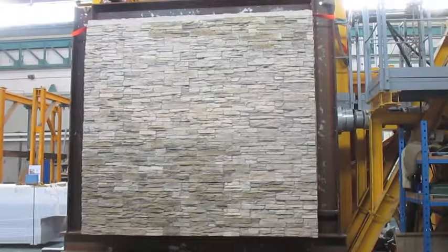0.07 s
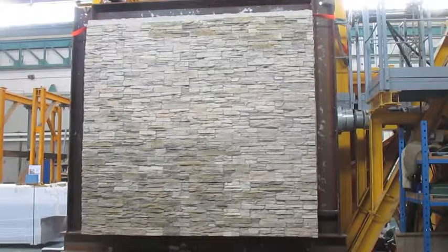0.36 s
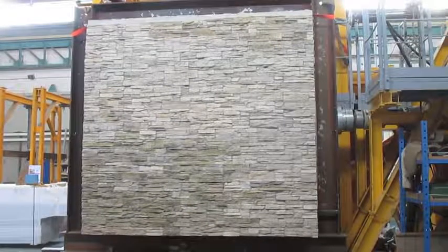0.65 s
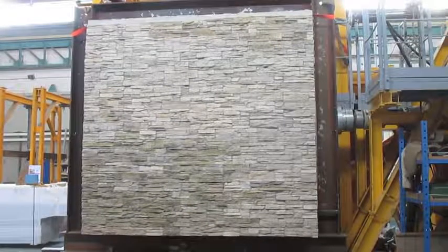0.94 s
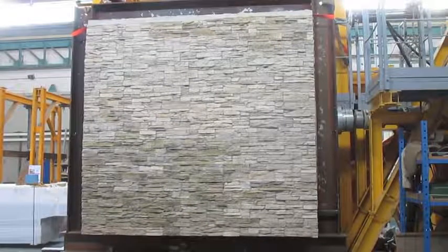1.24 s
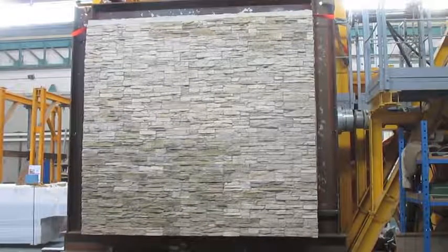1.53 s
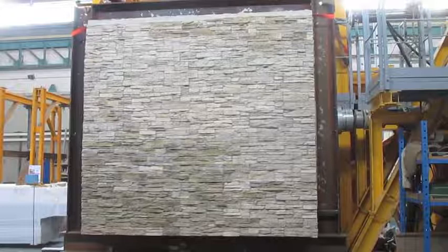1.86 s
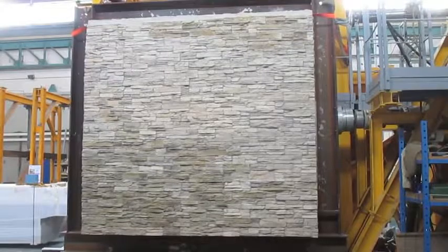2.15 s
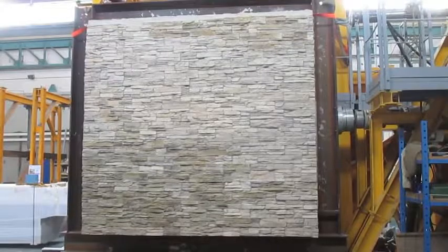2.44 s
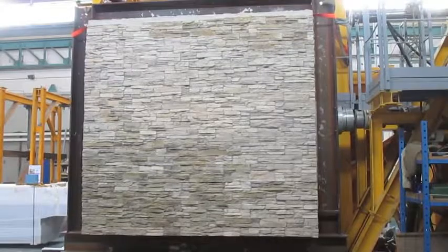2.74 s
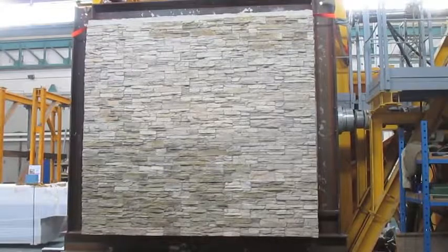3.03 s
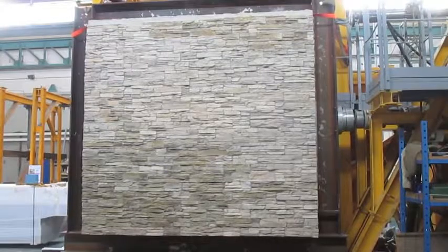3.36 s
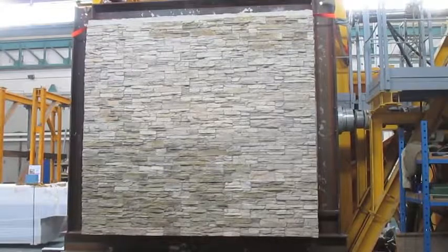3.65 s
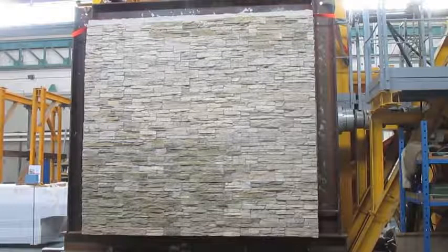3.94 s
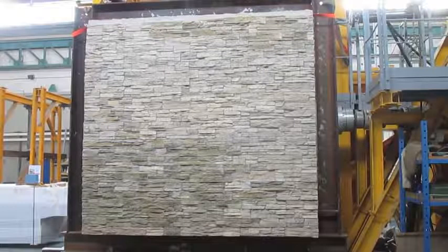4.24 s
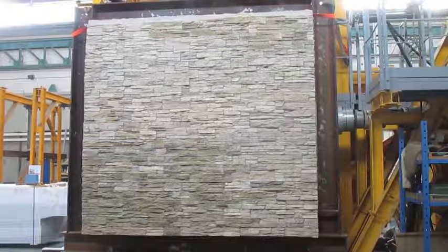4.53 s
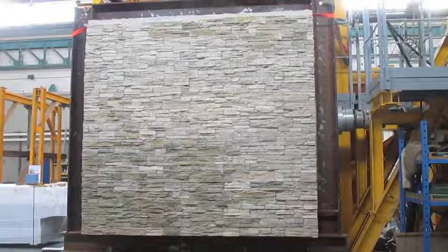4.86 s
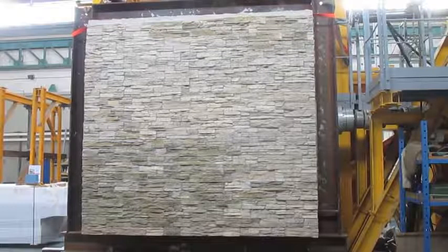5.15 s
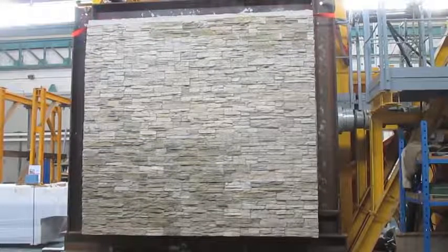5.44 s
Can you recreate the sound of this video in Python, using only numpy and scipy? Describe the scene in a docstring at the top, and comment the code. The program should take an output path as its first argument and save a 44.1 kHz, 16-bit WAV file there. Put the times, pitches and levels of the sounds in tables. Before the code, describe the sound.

An echo dies away in a large hall, leaving a faint hydraulic hum and whine. After a brief valve hiss, a shake table slams into motion, and a stone wall rattles loudly over the fast drumming of its steel frame for about a second. The noise rings out, the hum returns, and a second similar burst follows. Each burst includes a couple of dull knocks from loose blocks.

```python
"""Two bursts of drumming and stone clatter, about fifteen strokes a second, ring on in a large hall.
A hydraulic shake table rocks a stacked-stone wall in a steel frame: each stroke drums the frame
and sets the stones chattering. Between the bursts the hydraulics hum and hiss.
At the start, the echo of an earlier burst dies away."""
import sys
import numpy as np
from scipy import signal
from scipy.fft import rfft, irfft
from scipy.io import wavfile

SR = 44100
rng = np.random.default_rng(int(sys.argv[2]) if len(sys.argv) > 2 else 0)


def put_to_file(sound):
    """Save the sound as 16-bit audio at rate SR, in the file named by the first command-line argument."""
    columns = np.atleast_2d(sound).T  # one column per channel
    safe = np.clip(columns, -1, 1)
    whole_steps = np.round(safe * 32767)
    wavfile.write(sys.argv[1], SR, whole_steps.astype(np.int16))


N = 246519
T = np.arange(N) / SR
HZ = np.fft.rfftfreq(N, 1 / SR)
STROKE_HZ = 15.1

# Runs of the shake table. Each row: start in seconds, wind-up in seconds, opening force in dB.
BURSTS = [(1.682, 0.054, -1), (4.539, 0.097, -2.5)]
# Loose blocks dropping back. Each row: time in seconds, knock level in dB, thump level in dB.
BLOCK_DROPS = [(2.446, -2, -20), (2.57, -13, -12), (4.906, -10.5, -11.5), (5.035, -17, -6)]
# Hiss of oil in a valve. Each row: frequency in Hz, relative level in dB.
VALVE_HISS = [(300, -30), (1500, 2), (3000, -3), (5000, -3.5), (6500, -13), (10000, -18.5), (15000, -33)]


def frame(drum_db=-18.5, boom_db=-16.5, wander_rad=0.41):
    """Each stroke drums the steel frame; its resonances sustain a few stroke multiples as a boom."""
    # Frame spectrum. Each row: frequency in Hz, relative level in dB.
    frame_shape = [(15, -35), (28, -0.5), (45, -8), (65, -9), (100, -0.5), (160, -2), (250, 3.5), (330, 1),
                   (420, -3.5), (700, -8), (1200, -31), (4000, -100)]
    # Resonant harmonics. Each row: multiple of the stroke rate, relative level in dB.
    harmonics = [(3, -22.5), (9, -11.5), (12, -8.5), (13, -13), (16, -5), (21, -13)]
    drive = shaking(depth=1.4, fade_s=0.08, lead_s=0.0029, lag_s=0.039,
                    build_db_per_s=177, jolt_db=5.5, slope_db_per_s=-5)
    drum = amp(drum_db) * noise(spectrum(frame_shape)) * drive
    wander, boom = drift(hz=3.4), np.zeros(N)
    for multiple, db in harmonics:
        phase = 2 * np.pi * (multiple * STROKE_HZ * T + rng.random())
        boom += amp(db) * np.sqrt(2) * np.cos(phase + wander_rad * np.roll(wander, rng.integers(N)))
    boom *= amp(boom_db) * shaking(depth=0.65, fade_s=0.25, slope_db_per_s=-7)
    return hall(drum + thumps(), wet_db=-7) + boom


def stones(level_db=-22):
    """Loose stones chatter in a surge after each stroke."""
    clatter = colour(contacts(per_s=2500, spread_db=2.5), stone_colour_db())
    return amp(level_db) * clatter * shaking(depth=2.5, fade_s=0.1, jolt_db=2.5, slope_db_per_s=0.7)


def slams(slam_db=-5.5, rise_s=0.0029):
    """Many stones land at once as a burst opens, brighter when harder; dropping blocks knock dully."""
    # Slams at the table's first turns. Each entry: seconds into the burst.
    slam_ages_s = [0, .043, .094, .158, .228, .291]
    out, t = np.zeros(N), T[:SR // 4]
    body_db = spectrum([(60, -13.5), (250, -7.5), (700, -4), (3500, -1.5), (9000, -15)])
    clatter = colour(contacts(per_s=6500, spread_db=-1.5), stone_colour_db() + body_db)
    hz = np.fft.rfftfreq(len(t), 1 / SR)
    octaves = np.log2(np.clip(hz, 300, 5000) / 1000)

    def blow(db, decay_s, tilt_db_per_oct, ring_hz):
        """A dying cluster of contacts, tinted by the part that is hit."""
        cluster = np.roll(clatter, rng.integers(N))[:len(t)]
        tint_db = tilt_db_per_oct * octaves + resonance_db(ring_hz, width_hz=400, db=3, hz=hz)
        cluster = unit(irfft(rfft(cluster) * amp(tint_db), len(t)))
        return amp(db) * cluster * (1 - np.exp(-t / rise_s)) * np.exp(-t / decay_s)

    for start_s, wind_up_s, burst_db in BURSTS:
        for age_s in slam_ages_s:
            force_db = burst_db + opening_force_db(age_s, wind_up_s)
            slam = blow(slam_db + force_db, decay_s=0.023, tilt_db_per_oct=0.21 * force_db, ring_hz=1150)
            add(out, start_s + age_s, slam)
    for start_s, db, _ in BLOCK_DROPS:
        add(out, start_s, blow(db, decay_s=0.0099, tilt_db_per_oct=-7.5, ring_hz=515))
    return out


def thumps():
    """The table takes up its load as each burst opens; dropping blocks land with their weight."""
    # Heaves between the slams. Each row: seconds into the burst, pitch in Hz, relative level in dB.
    heaves = [(.031, 186, -4.5), (0.067, 189, -2.5), (0.074, 60.7, -16), (0.118, 262, -10.5),
              (.135, 65, -25), (.171, 161, -9)]
    out = np.zeros(N)
    for start_s, wind_up_s, burst_db in BURSTS:
        for age_s, hz, db in heaves:
            add(out, start_s + age_s, thump(hz, db + burst_db + opening_force_db(age_s, wind_up_s)))
    for start_s, _, db in BLOCK_DROPS:
        add(out, start_s, thump(hz=229, db=db))
    return out


def thump(hz, db, swell_cycles=0.7):
    """A few heavy low cycles."""
    cycles = hz * T[:SR // 5]
    swell = cycles / swell_cycles
    return amp(db) * np.sin(2 * np.pi * cycles) * swell * np.exp(1 - swell)


def steel_ring(level_db=-9.5):
    """The clatter keeps the frame members ringing in sympathy."""
    # Member resonances. Each row: frequency in Hz, relative level in dB.
    modes = [(690, -43.5), (895, -43.5), (1210, -52), (1455, -32), (2229, -34), (3375, -40), (3827, -49.5),
             (4190, -37), (4249, -42.5), (4497, -48), (4854, -39.5), (5458, -56)]
    rings = sum(amp(db) * fuzzy_tone(hz, width_hz=34) for hz, db in modes)
    return amp(level_db) * rings * shaking(depth=1.1, fade_s=0.04)


def shaking(depth, fade_s, lead_s=0, lag_s=0.028, build_db_per_s=400, jolt_db=0, slope_db_per_s=0):
    """Burst envelope: wind-up, jolt, run, fade. The surge at each stroke blurs as the stones loosen."""
    first_stroke_s, run_s, jolt_s, blur_s = 0.0907, 0.94, 0.033, 0.9
    swell_strokes, sag_strokes = 0.12, 0.15
    strength = np.zeros(N)
    for start_s, wind_up_s, _ in BURSTS:
        age_s = np.maximum(T - start_s - first_stroke_s, 0)
        stroke_phase = ((age_s + lead_s) * STROKE_HZ) % 1
        pulse = (1 - np.exp(-stroke_phase / swell_strokes)) * np.exp(-stroke_phase / sag_strokes)
        surge = 1 + depth * np.exp(-age_s / blur_s) * (pulse - pulse[age_s > 0].mean())
        since_full_s = T - start_s - wind_up_s - lag_s
        db = build_db_per_s * np.minimum(since_full_s, 0)
        db += jolt_db * np.exp(-abs(since_full_s) / jolt_s)
        db += slope_db_per_s * np.minimum(age_s, run_s)
        strength += amp(db) * surge * np.exp(-np.maximum(age_s - run_s, 0) / fade_s)
    return strength


def opening_force_db(age_s, wind_up_s, build_db_per_s=240, hold_s=0.064, settle_db_per_s=64):
    """The opening blows grow, hold, then ease off as the wall settles."""
    early_s, late_s = max(wind_up_s - age_s, 0), max(age_s - wind_up_s - hold_s, 0)
    return -build_db_per_s * early_s - settle_db_per_s * late_s


def contacts(per_s, spread_db):
    """Random stone-on-stone clicks of unequal size."""
    clicks = (rng.random(N) < per_s / SR) * rng.choice([-1, 1], N)
    return clicks * amp(spread_db * np.minimum(rng.exponential(1, N), 3))


def stone_colour_db():
    """The ring of the stacked stones: a broad spectrum with narrow resonances."""
    # Clatter spectrum. Each row: frequency in Hz, relative level in dB.
    stone_shape = [(15, -31), (30, -25), (80, -12.5), (160, 1.5), (300, -3), (550, -1), (1100, -3),
                   (1700, -9.5), (3000, -13), (4600, -17), (6000, -24.5), (8000, -33.5), (12000, -43),
                   (16000, -51)]
    # Stone resonances. Each row: centre in Hz, width in Hz, rise in dB.
    modes = [(484, 63, 2.2), (565, 34, 4.9), (681, 7.2, 9.1), (889, 35, 3.1), (1197, 53, 1.5),
             (3680, 89, 1.3), (4170, 114, 4.7), (4440, 60, 2.8), (5480, 130, 4.4)]
    return spectrum(stone_shape) + sum(resonance_db(*mode) for mode in modes)


def hydraulics(rush_db=-41, waver_rad=0.32, hold_flutter=0.036, release_s=0.05):
    """Pump rush and whine follow the load; the actuator sings one tone while it holds still."""
    # Pump whine. Each row: frequency in Hz, level in dB before the load gain.
    partials = [(131, -62), (231.5, -51), (301.5, -57.5), (398.4, -54.5), (457.6, -56), (500.6, -55.5),
                (690, -55), (1022, -58.5), (1220, -68), (1398, -67), (1573, -68), (2096, -66.5),
                (2196, -65), (2476, -63.5), (2950, -86.5), (3571, -69.5), (7350, -86)]
    # Oil rushing through the pump. Each row: frequency in Hz, relative level in dB.
    oil_shape = [(15, -24), (28, -4.5), (70, -11), (150, -7.5), (300, -7), (700, -10), (1100, -17.5),
                 (1700, -25.5), (2500, -24), (3800, -32), (5200, -36), (6300, -49.5), (7300, -47),
                 (8200, -52.5), (15000, -61)]
    # Pump load. Each row: time in seconds, gain in dB.
    load = [(0, 7), (.85, 0.5), (1.1, 2), (1.6, 2.5), (4, -5)]
    # Actuator tones. Each row: start, end and swell in seconds, pitch in Hz, level in dB,
    # octave in dB relative to the tone.
    hold_tones = [(.2, 1.8, 0.48, 350.2, -39.5, -21), (2.85, 4.7, .1, 165.8, -41.5, -20)]
    wander, whine = drift(hz=8), np.zeros(N)
    for hz, db in partials:
        whine += amp(db) * np.sin(2 * np.pi * hz * T + waver_rad * np.roll(wander, rng.integers(N)))
    pump = amp(rush_db) * noise(spectrum(oil_shape)) + np.sqrt(2) * whine
    out = pump * amp(np.interp(T, *np.transpose(load)))
    for start_s, end_s, swell_s, hz, db, octave_db in hold_tones:
        phase = 2 * np.pi * hz * T
        tone = np.sqrt(2) * (np.sin(phase) + amp(octave_db) * np.sin(2 * phase))
        gate = np.clip(np.minimum((T - start_s) / swell_s, (end_s - T) / release_s), 0, 1)
        out += amp(db) * tone * gate * (1 + hold_flutter * wander)
    return out


def valves():
    """Valves open just before each burst: oil spurts with a hiss and a fuzzy whistle."""
    # Each row: start in seconds, length in seconds, level in dB, whistle in Hz, whistle rise in dB.
    spurts = [(1.628, 0.066, -41, 2080, 11), (4.484, 0.097, -49, 2210, 4)]
    out = np.zeros(N)
    for start_s, length_s, db, hz, whistle_db in spurts:
        size = int(length_s * SR)
        hiss = noise(spectrum(VALVE_HISS) + resonance_db(hz, width_hz=220, db=whistle_db))[:size]
        add(out, start_s, amp(db) * hiss * signal.windows.tukey(size, 0.4))
    return out


def squeals(hiss_db=-4.5):
    """Throttled oil squeals briefly: a rough whistle in a little hiss."""
    # Each row: start in seconds, length in seconds, level in dB, pitch in Hz.
    whistles = [(0.963, 0.15, -52, 2510), (0.994, 0.22, -53.5, 2900), (1.148, 0.14, -51, 2300)]
    out = np.zeros(N)
    for start_s, length_s, db, hz in whistles:
        size = int(length_s * SR)
        whistle = fuzzy_tone(hz, width_hz=130) + amp(hiss_db) * noise(spectrum(VALVE_HISS))
        add(out, start_s, amp(db) * whistle[:size] * signal.windows.tukey(size, 0.7))
    return out


def earlier_echo(level_db=-25.5):
    """The hall still rings from a burst that has just ended, its treble already dull."""
    air_db = spectrum([(40, 13.5), (200, 1), (700, 0), (2000, -2.5), (5000, -6), (9000, -20)])
    return amp(level_db) * die_away(noise(stone_colour_db() + air_db))


def hall(x, wet_db, delay_s=0.014, build_s=0.015):
    """Direct sound plus the hall's diffuse tail, which swells in after it."""
    onset = 1 - np.exp(-np.maximum(T - delay_s, 0) / build_s)
    tail = die_away(rng.standard_normal(N)) * onset
    return x + amp(wet_db) * signal.fftconvolve(x, tail / np.linalg.norm(tail))[:N]


def die_away(x):
    """Each band fades at the hall's own rate."""
    # Reverberation. Each row: frequency in Hz, seconds to fall 60 dB.
    t60_s = [(40, 3.85), (150, 2.65), (500, 2.83), (1000, 2.8), (2000, 2.71), (4000, 2.3), (5500, 1.86),
             (7500, 1.54), (10000, 1.55), (15000, 1.02)]
    hz, t, bands = signal.stft(x, SR, nperseg=512)
    decay = amp(-60 * t / spectrum(t60_s, hz)[:, None])
    return signal.istft(bands * decay, SR, nperseg=512)[1][:N]


def colour(x, db):
    """Minimum-phase filter with the given gain curve; unit rms out."""
    cepstrum = irfft(np.log(amp(db)), N)
    cepstrum[1:N // 2] *= 2
    cepstrum[N // 2:] = 0
    taps = irfft(np.exp(rfft(cepstrum)), N)[:8192]
    return unit(signal.fftconvolve(x, taps)[:N])


def noise(db):
    """Steady noise with the given spectrum, unit rms."""
    return unit(irfft(rfft(rng.standard_normal(N)) * amp(db), N))


def fuzzy_tone(hz, width_hz):
    """Noise in one narrow resonance."""
    return noise(-20 * np.log10(1 + ((HZ - hz) / width_hz) ** 2))


def drift(hz):
    """Random wander slower than about hz, unit rms."""
    return unit(irfft(rfft(rng.standard_normal(N)) * np.exp(-(HZ / hz) ** 2), N))


def spectrum(points, hz=HZ):
    """Interpolates (Hz, value) rows on a log-frequency axis."""
    points_hz, values = np.transpose(points)
    return np.interp(np.log(hz + 1), np.log(points_hz + 1), values)


def resonance_db(centre_hz, width_hz, db, hz=HZ):
    """One resonance as a rise in dB."""
    return db / (1 + (2 * (hz - centre_hz) / width_hz) ** 2)


def amp(db):
    """Decibels to gain."""
    return 10 ** (np.asarray(db) / 20)


def unit(x):
    """Scales to unit rms."""
    return x / np.sqrt(np.mean(x ** 2) + 1e-20)


def add(mix, start_s, sound):
    """Mixes a sound in at start_s."""
    part = mix[max(round(start_s * SR), 0):][:len(sound)]
    part += sound[:len(part)]


def scene():
    """Wall, frame and hydraulics in the hall, mono."""
    wall = hall(stones() + steel_ring(), wet_db=-1.5) + hall(slams(), wet_db=-5.5)
    oil = hall(valves(), wet_db=7.5) + hall(squeals(), wet_db=-3.5) + hydraulics()
    return (wall + frame() + oil + earlier_echo())[None]


def record(dry):
    """Rounds off the loudest peaks, then cuts the top treble."""
    ceiling, cutoff_hz = 0.98, 15700
    rounded = dry / (1 + (dry / ceiling) ** 6) ** (1 / 6)
    lowpass = signal.firwin(1023, cutoff_hz, window=("kaiser", 9), fs=SR)
    return signal.oaconvolve(rounded, lowpass[None], "same")


dry = scene()
out = record(dry)
put_to_file(out)
```